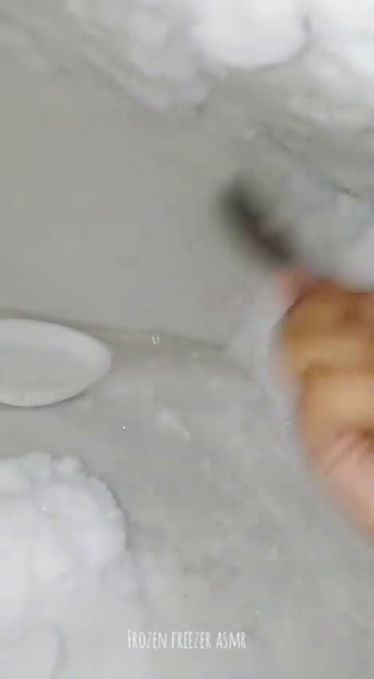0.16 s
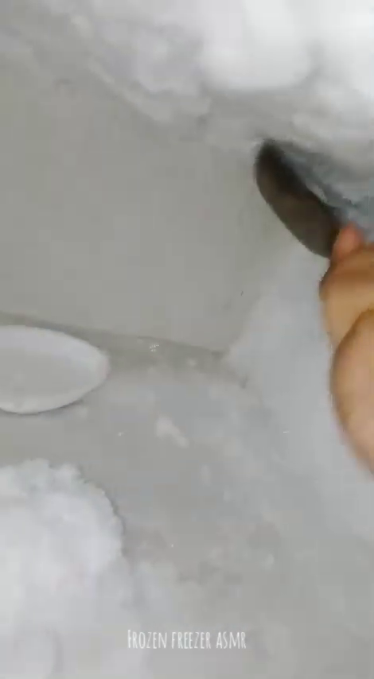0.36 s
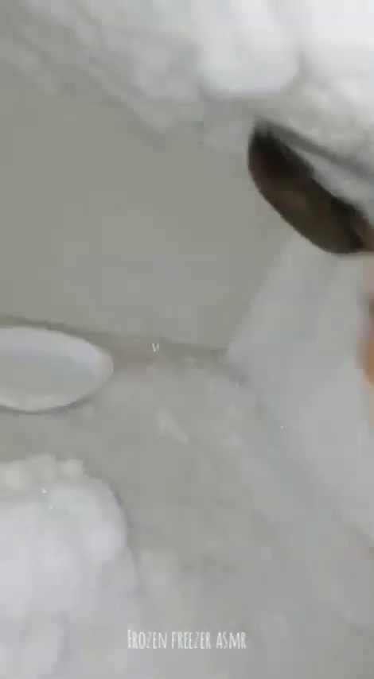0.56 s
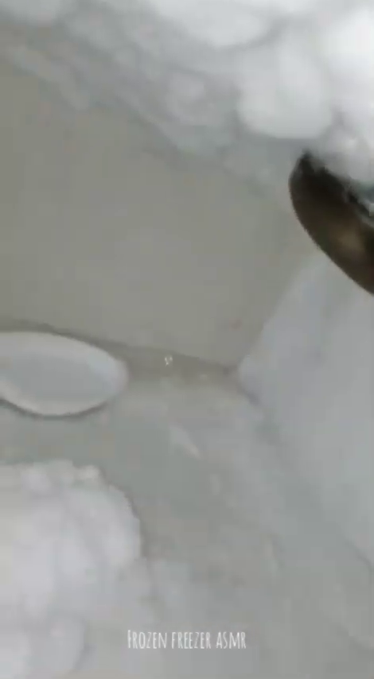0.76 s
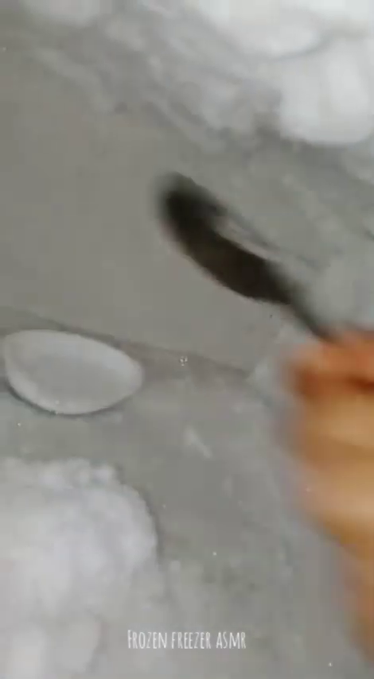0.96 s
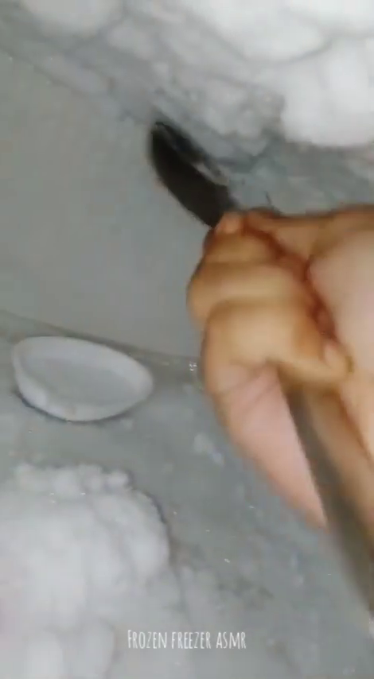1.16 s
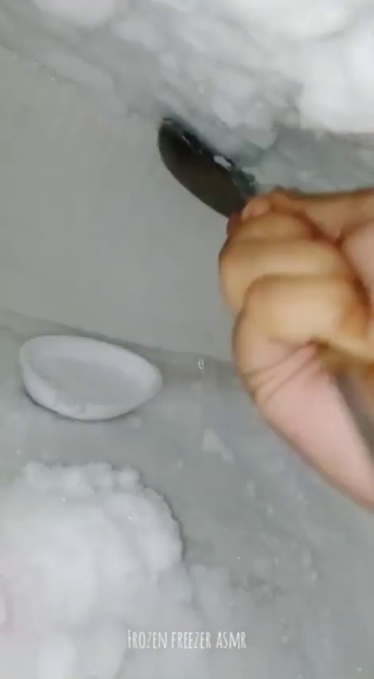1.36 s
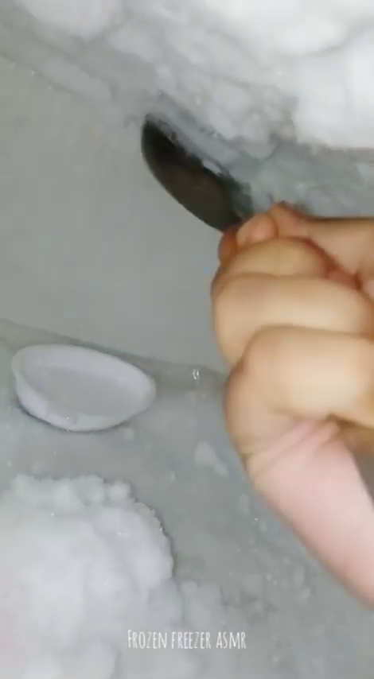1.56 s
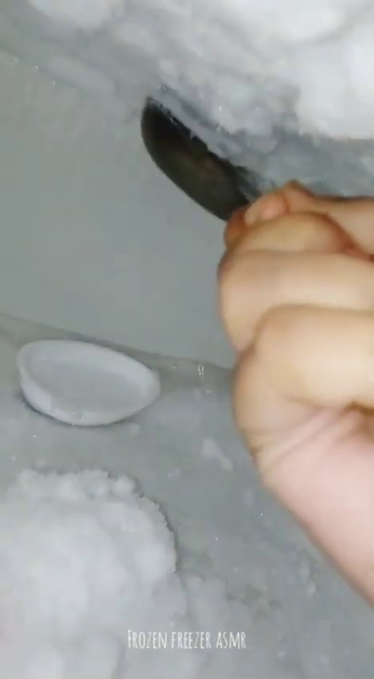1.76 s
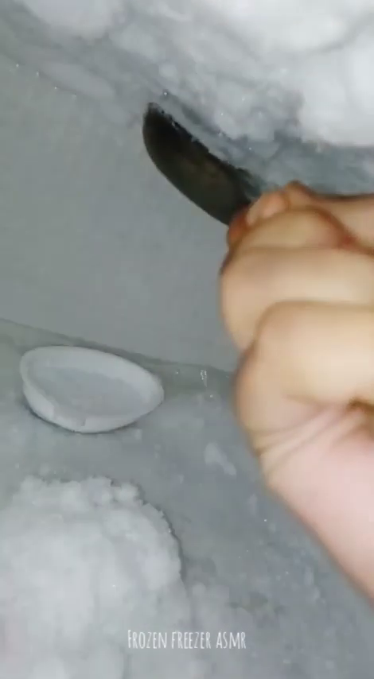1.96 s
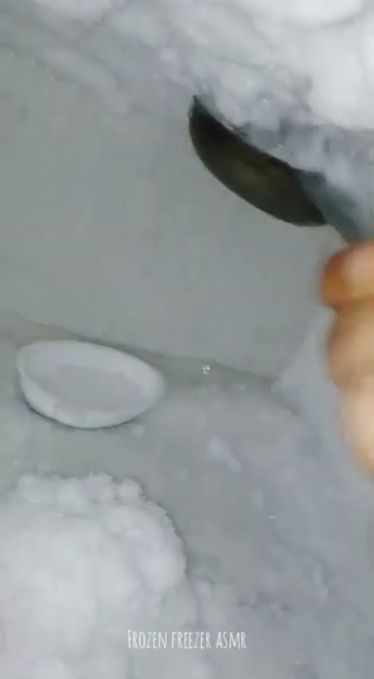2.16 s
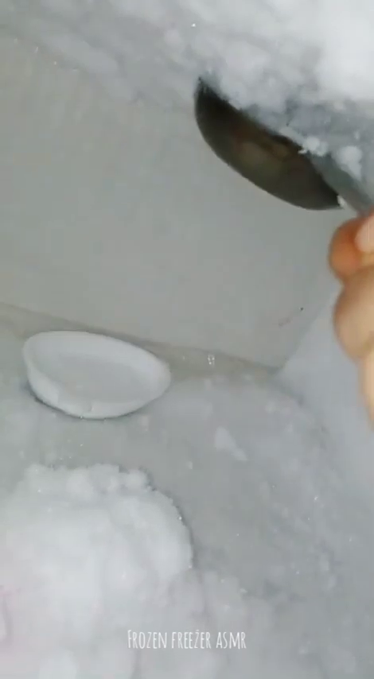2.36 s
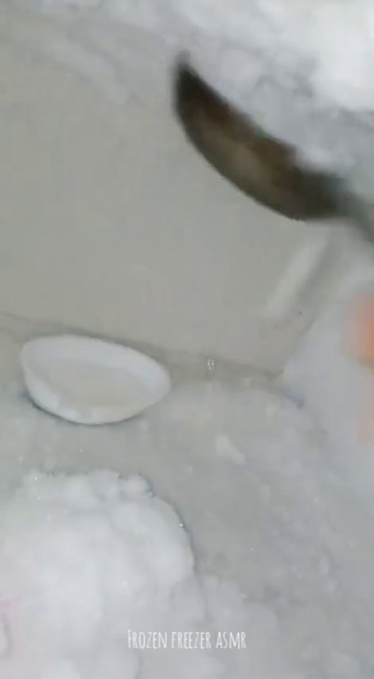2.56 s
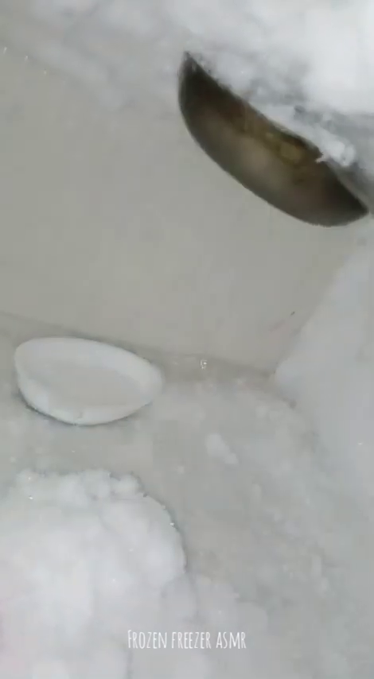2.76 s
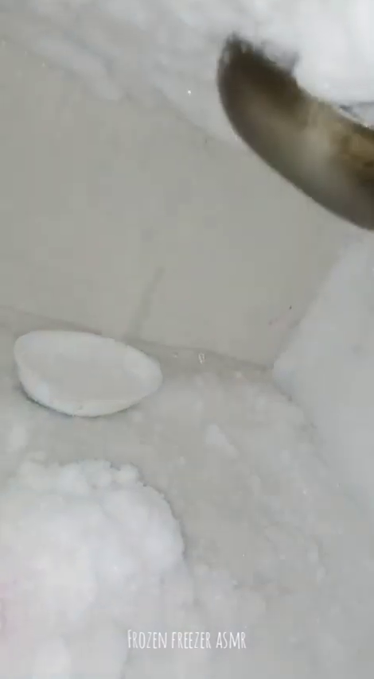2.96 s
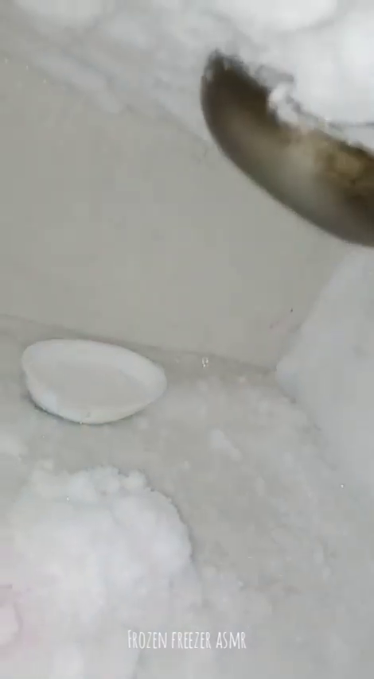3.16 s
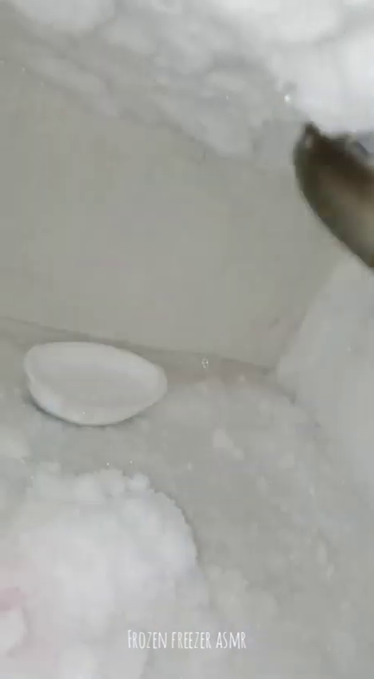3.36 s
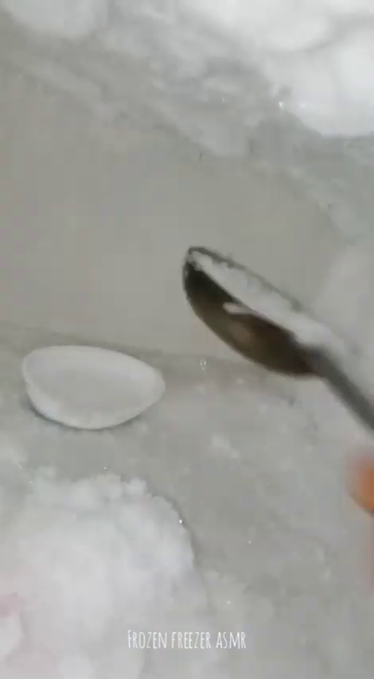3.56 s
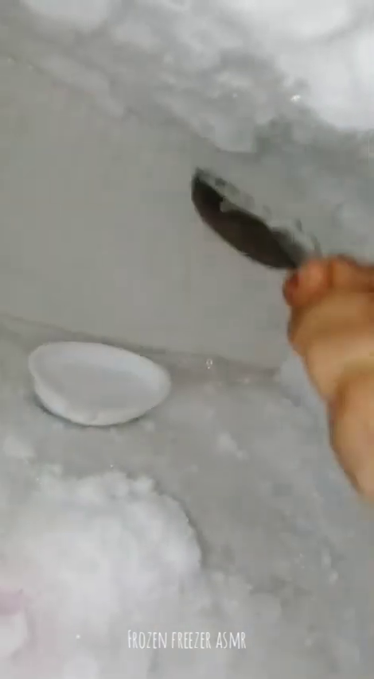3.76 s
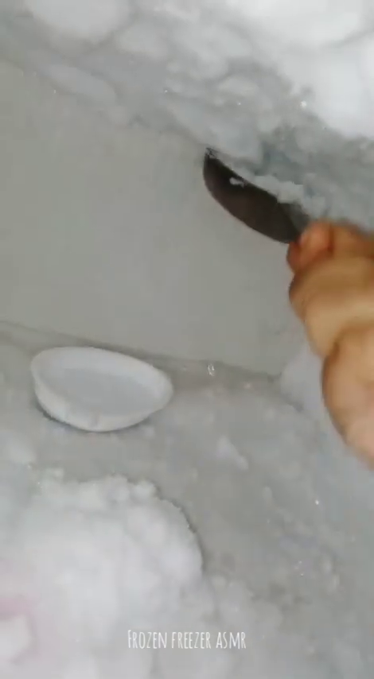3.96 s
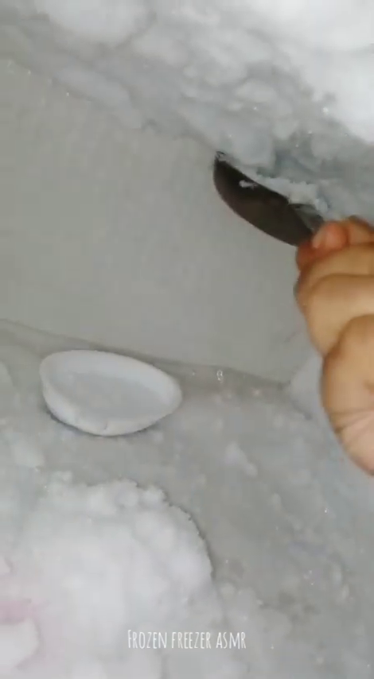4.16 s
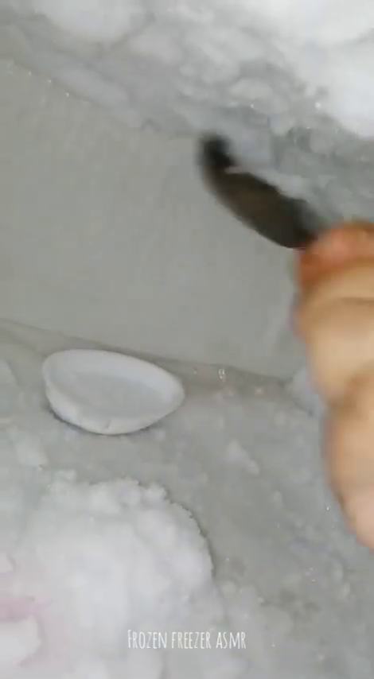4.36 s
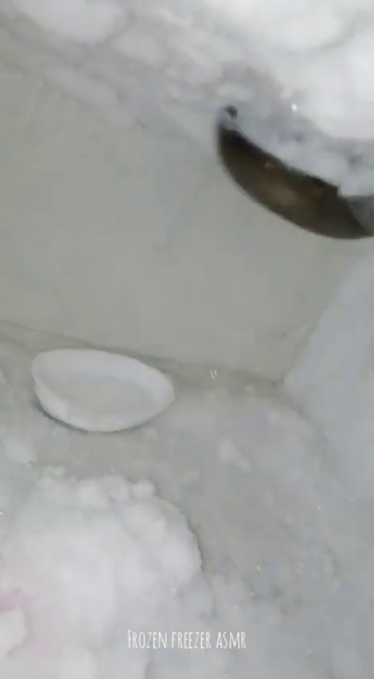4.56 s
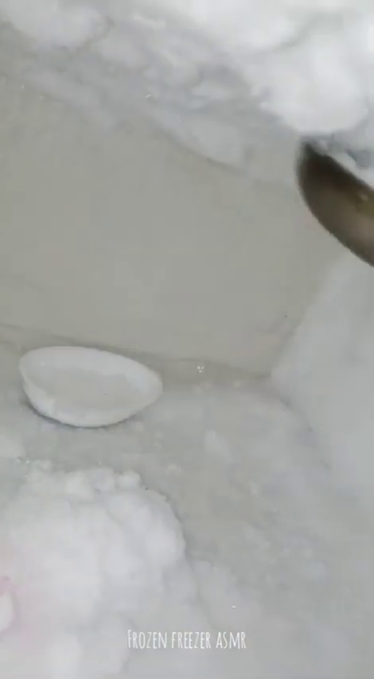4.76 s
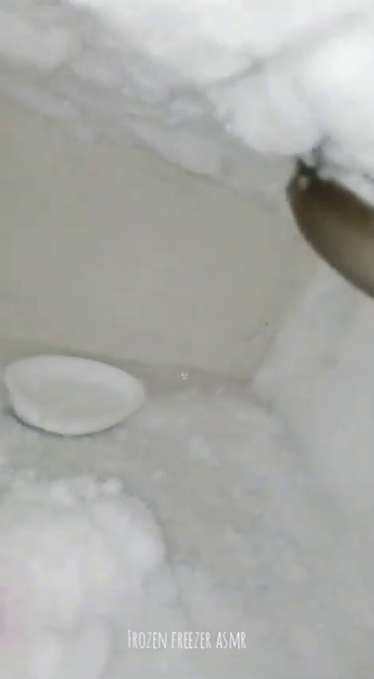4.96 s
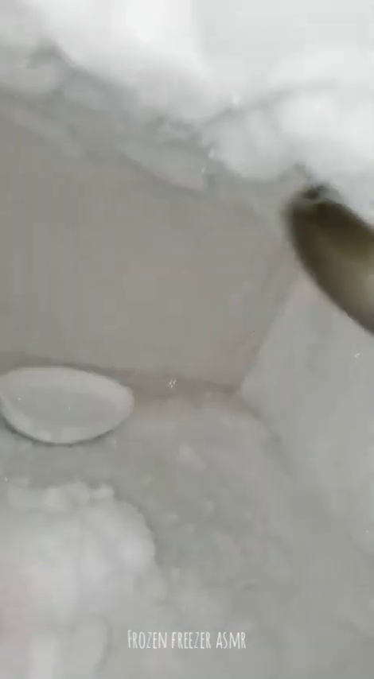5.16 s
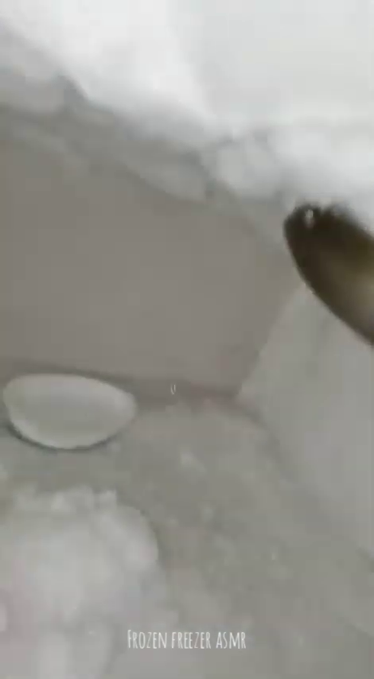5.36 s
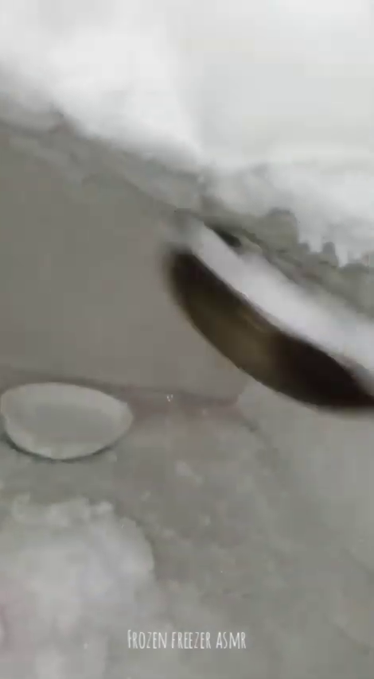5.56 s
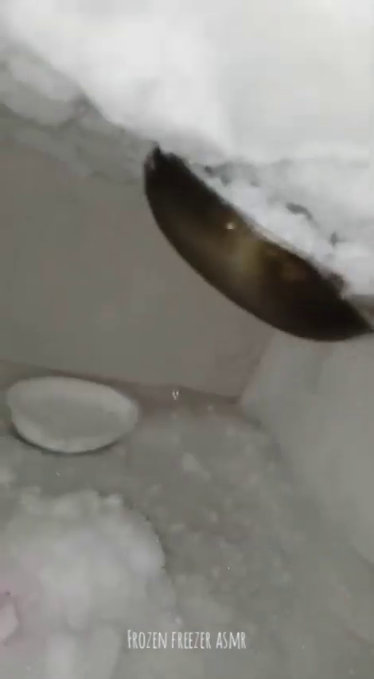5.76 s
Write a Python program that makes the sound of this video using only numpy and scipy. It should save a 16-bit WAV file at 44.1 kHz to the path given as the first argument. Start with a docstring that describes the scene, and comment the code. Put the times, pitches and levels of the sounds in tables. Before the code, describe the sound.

A metal spoon scrapes thick frost inside a freezer in uneven strokes, with crisp crunching, sharp cracks, dull wall thumps and small pattering crumbs.

```python
"""Spoon scraping freezer frost

A steel spoon scrapes thick frost off a freezer wall, close to a phone with one microphone.
Random crystal breaks excite resonances of wall, ice and spoon, and are also heard directly as coloured noise.
Crusts crack as short noise bursts, chunks thump the wall as damped sines, and crumbs patter in showers.
The cabinet answers with a brief decaying tail, over a low rumble that swells with the push."""
import sys
import numpy as np
from scipy import signal
from scipy.fft import rfft, irfft, next_fast_len
from scipy.io import wavfile
from scipy.ndimage import uniform_filter1d, map_coordinates

SR = 44100
rng = np.random.default_rng(int(sys.argv[2]) if len(sys.argv) > 2 else 0)


def wrap_up_sound(samples):
    """Save the sound to the file named by the first command line argument, as 16-bit audio."""
    columns = np.atleast_2d(samples).T
    # keep every value between -1 and 1, then stretch to whole-number steps
    tamed = np.clip(columns, -1, 1)
    steps = np.round(tamed * 32767).astype(np.int16)
    wavfile.write(sys.argv[1], SR, steps)


N = 256662  # length [samples]

# upper modes of wall and ice: (frequency [Hz], width [Hz], relative level [dB])
LINER = [(372, 72, -3.5), (493, 45.7, 5.5), (665, 540, -13), (803, 99, -2), (945, 56, 1), (1243, 77, -8)]
# modes of the spoon, damped by ice: (frequency [Hz], width [Hz], relative level [dB])
SPOON = [(1648, 21, 6.5), (1998, 170, 3), (2250, 160, -5.5), (2600, 60, 5), (3077, 390, -0.5),
         (4336, 58, 2.5), (5750, 100, -10.5), (6600, 284, 3), (8480, 350, -11), (9200, 324, -3),
         (10800, 330, -25), (11330, 300, -21), (15100, 3400, -10)]


def amp(db):
    """Level to amplitude: 20 dB is a factor of ten."""
    return 10 ** (np.asarray(db) / 20)


def unit(x):
    """Normalisation to a root-mean-square of one."""
    return x / np.sqrt(np.mean(x ** 2) + 1e-20)


def along(points, hz):
    """Linear interpolation of (frequency [Hz], value) points on a logarithmic frequency axis."""
    f, v = np.transpose(points)
    return np.interp(np.log(hz + 1), np.log(f + 1), v)


def wobble(rate):
    """Slow random fluctuation: a smooth curve through random knots, rate of them a second."""
    knots = rng.standard_normal(int(N * rate / SR) + 4)
    return map_coordinates(knots, [np.arange(N) * rate / SR])


def filtered(x, response):
    """Linear filtering: the spectrum of x times a complex response of frequency."""
    m = next_fast_len(N + SR // 2)  # room for the tail
    spectrum = rfft(x, m) * response(np.fft.rfftfreq(m, 1 / SR))
    return irfft(spectrum, m)[..., :N]


def modes(table):
    """Modal superposition: causal damped resonances of alternating sign."""
    def response(f):
        return sum((-1) ** k * amp(db) * 1j * f * width / (centre * centre - f * f + 1j * f * width)
                   for k, (centre, width, db) in enumerate(table))
    return response


def crush(rate, ms, spread_db, smooth):
    """Random fracture: breaks of uneven size, each a noise swell peaking after ms, on smooth friction."""
    happens = rng.random(N) < rate / SR
    breaks = happens * amp(spread_db * rng.standard_normal(N))
    u = 1000 * np.arange(SR // 20) / SR / ms
    bursts = signal.fftconvolve(breaks, u * np.exp(-u))[:N]
    return (unit(bursts) + smooth) * rng.standard_normal(N)


def ringing(excite, table, lift_db, unrest_db):
    """Forced resonance: each mode has its own breaks; hand and ice damp each differently over time."""
    total = 0
    for mode in table:
        unrest = unrest_db * (wobble(18) + 1.2 * wobble(4.057))
        total = total + amp(unrest + lift_db(mode[0])) * filtered(excite(), modes([mode]))
    return total


def scraping():
    """Stick-slip fracture under one uneven grip drives wall, ice and spoon."""
    # bite of the rim, one curve for each stroke from touch to rest:
    # (time [s], pressure as level of the crystal hiss [dB])
    strokes = [
        [(0, -70), (.012, -31), (.045, -48.5), (.12, -65), (.19, -62)],
        [(.205, -31), (.236, -38.5), (.252, -26.5), (.294, -48)],
        [(.31, -44), (.366, -27.5), (.45, -34), (.5, -21), (.53, -38), (.56, -28), (.672, -28), (.735, -36),
         (.755, -47.5), (.82, -40), (.848, -56), (.96, -71), (1.135, -81)],
        [(1.148, -46), (1.2, -27.5), (1.234, -49.5), (1.278, -46.5), (1.31, -67)],
        [(1.35, -53), (1.385, -47.5), (1.42, -53)],
        [(1.435, -37), (1.45, -34.5), (1.49, -32.5), (1.558, -32), (1.63, -29), (1.655, -35.5), (1.68, -57),
         (1.754, -63), (1.89, -73)],
        [(1.91, -61), (1.99, -65), (2.03, -45.5), (2.055, -58)],
        [(2.068, -23.5), (2.108, -27.5), (2.128, -33.5), (2.164, -22.5), (2.185, -33), (2.216, -51.5),
         (2.26, -48.5), (2.44, -70.5)],
        [(2.48, -39.5), (2.52, -29), (2.556, -22), (2.614, -29.5), (2.64, -39), (2.7, -55), (2.76, -43)],
        [(2.778, -24), (2.832, -21), (2.882, -31), (2.9, -22.5), (2.922, -34.5), (2.94, -46.5), (2.985, -43)],
        [(3.03, -38.5), (3.07, -38), (3.12, -43), (3.152, -54.5), (3.18, -47.5)],
        [(3.198, -26.5), (3.25, -27), (3.3, -39.5), (3.33, -49), (3.376, -40.5), (3.41, -54.5), (3.476, -69.5),
         (3.62, -70), (3.8, -86)],
        [(3.82, -54), (3.9, -63), (3.935, -56.5), (3.947, -30.5), (3.97, -50.5), (4.0, -34), (4.025, -45.5),
         (4.045, -62)],
        [(4.07, -42), (4.09, -35.5), (4.14, -34), (4.172, -36.5), (4.244, -28.5), (4.31, -26), (4.378, -25),
         (4.426, -37), (4.48, -27), (4.54, -35), (4.6, -24.5), (4.7, -27), (4.8, -24), (4.85, -25), (4.88, -34),
         (4.95, -24.5), (5.0, -36), (5.015, -50.5)],
        [(5.068, -48.5), (5.1, -35), (5.208, -29), (5.235, -42), (5.26, -55.5), (5.38, -69)],
        [(5.4, -39), (5.43, -48.5), (5.54, -61), (5.64, -71)],
        [(5.662, -41.5), (5.696, -52), (5.734, -38), (5.82, -33.5)],
    ]
    # how the spoon meets the frost from each moment on: (time [s], wall drumming [dB], coarse crunch [dB],
    # best-ringing part of the spoon [Hz], lift of the finest fizz [dB]);
    # drumming and crunch are relative to the hiss at the usual pressure
    angles = [(0, -1, 7.5, 2780, -24), (.19, 1, -2, 3260, -16), (.3, -4, 3.5, 1996, -4),
              (.42, 3, 7, 1980, -3.5), (0.619, 2, 4, 2060, -2), (.76, 8, -2, 4380, -3),
              (.85, -5.5, -2.5, 1980, 5.5), (1.145, -5.5, 3.5, 2300, -11), (1.25, 3.5, 5.5, 2320, -0.5),
              (1.42, 5.5, 5.5, 2420, -6), (1.669, 16.5, 11, 2300, -19), (1.76, 7, 1.5, 4070, 0.5),
              (2.059, -11.5, 1, 2500, -4.5), (2.199, 11, 6.5, 2860, -8), (2.471, 2, 2, 2220, -6),
              (2.63, 8.5, -5, 2240, -15), (2.76, 3.5, 0, 2270, -2), (2.93, 5, -1.5, 2400, -2.5),
              (2.98, 10, 2, 3100, 1.5), (3.18, 5.5, 3.5, 2245, 3), (3.31, 8, 1.5, 3520, -2.5),
              (3.451, -0.5, 5, 2320, 0), (3.8, 0, 3.5, 2560, -9.5), (4.05, -0.5, 2.5, 1950, -6.5),
              (4.2, 2.5, 1, 2380, -8), (4.42, 1.5, 6, 3260, -0.5), (4.58, 3.5, 0.5, 4320, -3.5),
              (4.7, 4.5, -0.5, 2015, -1.5), (4.87, 2.5, 1, 4350, -1.5), (5.04, 4, 3.5, 1967, 0.5),
              (5.25, -1, -4, 3000, -4), (5.64, -4, 6.5, 2750, 1)]
    # low wall modes: (frequency [Hz], width [Hz], relative level [dB])
    wall_modes = [(167, 57, -1.5), (228, 48, 3.5), (267, 44, -0.5)]
    # the whole cabinet shaking: (frequency [Hz], width [Hz], relative level [dB])
    case_mode = (95, 50, -18)
    # crystals heard directly: (frequency [Hz], relative level [dB])
    frost = [(900, -39), (1500, -12), (2600, -17), (5000, -12.5), (7400, -20), (10000, -23.5),
             (13000, -26.5), (16000, -44.5)]
    usual_db = -30
    wall_grows, crunch_grows = .9, 1  # dB for each dB of pressure, counted from the usual pressure
    focus_db, focus_spread = 6, .13  # lift of the modes nearest the best-ringing part; reach in log frequency

    t = np.arange(N) / SR
    hiss_db = np.interp(t, *np.transpose(np.concatenate(strokes)))
    starts, *held = np.transpose(angles)
    now = np.searchsorted(starts, t, side="right") - 1
    # about 20 ms of smoothing between angles
    wall_db, crunch_db, focus, fizz_db = (uniform_filter1d(column[now], size=900) for column in held)
    wall_db = wall_db + usual_db + wall_grows * (hiss_db - usual_db)
    crunch_db = crunch_db + usual_db + crunch_grows * (hiss_db - usual_db)
    grip = amp(1.6 * wobble(35))

    def breaks():
        return grip * crush(220, 1.7, 4, .7)

    def near_focus(hz):
        return focus_db * np.exp(-(np.log(hz / focus) / focus_spread) ** 2)

    wall = filtered(breaks(), modes(wall_modes + [case_mode]))
    crunch = ringing(breaks, LINER, lambda hz: 0, unrest_db=2)
    direct = filtered(breaks(), lambda f: amp(along(frost, f)))
    hiss = unit(ringing(breaks, SPOON, near_focus, unrest_db=2) + direct)
    # faster strokes break finer crystals: the held lift acts above about 5.2 kHz
    fizz = filtered(hiss, lambda f: 1 / (1 + (5200 / (f + 1)) ** 6))
    crystals = amp(hiss_db) * (hiss + (amp(fizz_db) - 1) * fizz)
    return amp(wall_db) * unit(wall) + amp(crunch_db) * unit(crunch) + crystals


def rumble(push):
    """Amplitude modulation: low, unsteady noise swells with the smoothed power of the push."""
    # colour of the rumble: (frequency [Hz], relative level [dB])
    colour = [(18, -79), (30, -52.5), (53, -10), (75, -11), (210, -23.5), (512, -28.5), (684, -39.5),
              (822, -62.5), (2060, -41), (16000, -68)]
    # mean level without the push: (time [s], level [dB])
    rest = [(0, -56), (.15, -50), (.5, -63), (.9, -59), (1.02, -68), (1.15, -59), (1.85, -64), (2.301, -50),
            (3.1, -56), (3.5, -58.5), (3.85, -60.5), (4.1, -60), (5.1, -48), (5.45, -52), (5.62, -67),
            (5.82, -60)]
    shake_db, shake_s = -25.5, .045  # swell against wall and scrape sound; time constant of following

    noise = filtered(rng.standard_normal(N), lambda f: amp(along(colour, f)))
    power = filtered(push ** 2, lambda f: 1 / (1 + 2j * np.pi * f * shake_s))
    swell = np.sqrt(np.abs(power))
    still = amp(np.interp(np.arange(N) / SR, *np.transpose(rest)))
    return (still + amp(shake_db) * swell) * amp(.65 * wobble(23)) * unit(noise)


def cabinet(x):
    """Reverberation: each frequency of the box's answer dies at its own speed."""
    # decay: (frequency [Hz], time to fall by 60 dB [s])
    decay = [(200, 0.39), (1000, 0.14), (4000, 0.057), (12000, 0.0067)]
    hz, t, z = signal.stft(rng.standard_normal(SR // 2), SR, nperseg=256)
    fading = z * amp(-60 * t / along(decay, hz)[:, None])
    tail = signal.istft(fading, SR, nperseg=256)[1]
    return signal.fftconvolve(x, tail / np.linalg.norm(tail))[:N]


def cracks():
    """Brittle fracture: short noise bursts with a fast rise, which also ring the spoon."""
    # crust cracks: (time [s], burst level before colouring [dB],
    # part under 2.5 kHz relative to it before the common low gain [dB], time to fall by 60 dB [ms])
    crusts = [(0.0123, -20, -5, 17), (0.0288, -12, -2, 7.2), (0.1572, -30, -35, 17),
              (0.2082, -11.5, -11.5, 34), (0.2489, -21.5, -3.5, 57), (0.3172, -25.5, -4, 83),
              (0.4841, -5, -5, 6.4), (0.5373, -15, 8.5, 15), (0.7777, -30, -7, 93),
              (0.9164, -21, -18, 11.5), (1.144, -33.5, 12.5, 20), (1.176, -36, 11, 22),
              (1.193, -19, -4.5, 62), (1.3269, -30.5, -9, 13), (1.353, -29.5, -12, 29),
              (1.384, -24, 2.5, 21), (1.4093, -14.5, -20, 7.7), (1.429, -11, 3.5, 23), (1.486, -20, 3, 14),
              (1.5, -13.5, -1, 16), (1.537, -28, -8, 32), (1.7943, -35.5, -32, 25), (1.9034, -4, -15, 12.9),
              (2.0032, -24, -10, 11), (2.0273, -4, -21, 14), (2.0674, -19.5, 11, 9.1),
              (2.2753, -16, -30, 13), (2.292, -13, -33, 9.9), (2.3168, -20, -48, 25),
              (2.337, -15.5, -11, 11), (2.3765, -34, -19, 25), (2.397, -27, -16, 18), (2.4663, -30, -3, 15),
              (2.484, -15.5, 1.5, 12.6), (2.5155, -10.5, -5.5, 20), (2.6812, -29.5, -23, 32),
              (2.7279, -23.5, -5, 31), (2.7737, -21, 2, 22), (2.7965, -11.5, -7, 20), (2.822, -17, 6.5, 29),
              (2.862, -7, -12, 11), (2.8954, -19.5, 7, 22), (2.994, -7.5, -19, 12), (3.034, -11.5, -1, 10),
              (3.1118, -18, -7, 11.7), (3.1987, -33.5, 17, 110), (3.363, -23, -23, 23),
              (3.487, -29.5, -32, 13), (3.496, -36, -16.5, 13), (3.555, -33.5, -4, 16.3),
              (3.8146, -18.5, -3.5, 39), (3.915, -42, -3, 24), (3.931, -25, -30, 12),
              (3.9419, -22.5, 2, 19), (4.0647, -39.5, 11, 22), (4.129, -30, 3, 49), (4.183, -39, -5, 16),
              (4.2184, -22, 3, 26), (4.2435, -28.5, 8.5, 52), (4.262, -11, -8, 16), (4.3062, -25, 9, 90),
              (4.365, -30, 11, 37), (4.4066, -14, -5, 23), (4.474, -27, 0, 17), (4.505, 4.5, -34, 6.2),
              (4.8715, 0.5, -26, 10), (4.8923, -13, -1, 14), (5.0533, -19, -14, 23), (5.0814, -20, -25, 14),
              (5.1003, -15, -32, 13), (5.1813, -21, -4, 60), (5.294, -23, -12, 9.9), (5.3702, -29, -10, 16),
              (5.3924, -1, -11.5, 14.2), (5.648, -19.5, -6, 15), (5.665, -23.5, 3, 30)]
    # colour of a crack: (frequency [Hz], relative level [dB])
    snap_colour = [(80, -21.5), (150, 3), (700, -9), (2500, 0.5), (6000, -0.5), (10000, -19.5),
                   (16000, -36)]
    high, low, t = np.zeros(N + SR), np.zeros(N + SR), np.arange(SR // 10) / SR
    noise = rng.standard_normal((len(crusts), len(t)))
    for (s, db, low_db, t60), burst in zip(crusts, noise):
        burst = burst * amp(db - 60000 * t / max(t60, 3)) * (1 - np.exp(-t / .00099))
        start = round(s * SR)
        high[start:][:len(t)] += burst
        low[start:][:len(t)] += burst * amp(low_db)

    def snap(f):
        return amp(along(snap_colour, f))

    def treble(f):
        return 1 / (1 + (2500 / (f + 1)) ** 6)

    spoon = modes(SPOON)
    bright = filtered(high[:N], lambda f: treble(f) * (snap(f) + 1.2 * spoon(f)))
    dark = filtered(low[:N], lambda f: (1 - treble(f)) * snap(f))
    return bright + amp(12) * dark  # common low gain


def thumps():
    """Damped free vibration: the panel swings as a chunk tears loose; contact shortens its upper modes."""
    # chunks giving way: (time [s], level before the bass cut [dB],
    # shift of the upper modes against it [dB], panel pitch [Hz])
    chunks = [(0.014, -13.5, 6.5, 169.7), (.217, -22, -13.5, 194), (.357, -33, 0, 263),
              (.421, -12, 12.5, 221), (.578, -30, 0, 250), (.615, -7, -11.5, 223), (.787, -29, -6, 273),
              (1.145, -6, 0, 216.5), (1.194, -20, -1.5, 226), (1.346, -34, -4, 229),
              (1.38, -33.5, -26, 265), (1.609, -9.5, 5.5, 223), (1.797, -30.5, -11, 195),
              (2.071, -9, -14, 218), (2.101, -1.5, -4, 226), (2.151, -7.5, -31, 184),
              (2.481, -26, 6.5, 315), (2.513, -11.5, 9, 277.6), (2.558, -6.5, -25.5, 208),
              (2.573, -6.5, -15.5, 230), (2.61, -14.5, -14, 222.4), (2.65, -20, -14, 222),
              (2.778, -10.5, -7, 248), (2.795, -13, -14.5, 240.6), (2.836, -5, -28, 225),
              (2.898, -9, 2.5, 218), (3.046, -18.5, -25, 238), (3.08, -22.5, -23, 201),
              (3.113, -21.5, -18, 234), (3.197, -15, -5, 230), (3.229, -9, -16.5, 214),
              (3.283, -13, -15, 223), (3.34, -24.5, -2, 226), (3.816, -37, 23.5, 256),
              (3.943, -13, 5.5, 217.5), (4.214, -24.5, 0, 220), (4.312, -12, -21, 262),
              (4.347, -11.5, -12.5, 230), (4.382, -7, 4, 220), (4.407, 2, -30, 215), (4.472, -11, 5.5, 190),
              (4.523, -3.5, -1, 233), (4.607, -2.5, -20, 219), (4.657, -13.5, 0, 193),
              (4.797, -16, -12, 250), (4.851, -8.5, -23, 200.6), (4.894, -8, -23, 199),
              (5.1, -16.5, -19, 235), (5.13, -15.5, -26, 213), (5.187, -19.5, -19, 219),
              (5.392, -21.5, -27, 177), (5.667, -26, -7, 204), (5.728, -25.5, -16, 234),
              (5.766, -21, -10, 227)]
    tear_s = .014  # the panel swings freely this long before it is damped
    out, t = np.zeros(N + SR), np.arange(SR // 5) / SR
    chance = rng.standard_normal((len(chunks), len(LINER)))
    stop = amp(-60 * np.maximum(t - tear_s, 0) / .03)
    for (s, db, upper_db, pitch), scatter in zip(chunks, chance):
        strengths = amp(upper_db + 2 * scatter)
        ring = 0
        for k, ((hz, width, level), strength) in enumerate(zip(LINER, strengths)):
            fade = np.exp(-1.6 * np.pi * width * t)
            ring = ring + (-1) ** k * strength * amp(level - 11) * fade * np.sin(2 * np.pi * hz * t)
        swing = np.sin(2 * np.pi * pitch * t) * stop
        out[round(s * SR):][:len(t)] += amp(db) * (swing + ring)
    # little deep bass: a two-pole cut below about 110 Hz
    return filtered(out[:N], lambda f: (1j * f / (110 + 1j * f)) ** 2)


def crumbs():
    """Random impacts: loosened crystals patter in showers that swell, peak just before midway and thin out."""
    # showers of loose crumbs: (time [s], length [s], level at the fullest [dB])
    showers = [(0.143, 0.058, -50), (0.836, 0.1, -55), (1.792, 0.076, -59), (2.267, 0.18, -41),
               (2.687, 0.13, -43), (2.926, .06, -48), (3.06, 0.089, -52), (3.334, 0.1, -52),
               (4.99, 0.04, -61), (5.306, 0.15, -47.5), (5.428, 0.088, -48)]
    # colour of a crumb: (frequency [Hz], relative level [dB])
    crumb_colour = [(900, -29), (2000, -9.5), (4500, -1), (9000, -11), (16000, -15.5)]
    t = np.arange(N) / SR
    density = sum(amp(db) * np.sin(np.pi * np.clip((t - s) / length, 0, 1) ** .91)
                  for s, length, db in showers)
    patter = filtered(crush(110, .91, 4.5, .52), lambda f: amp(along(crumb_colour, f)))
    return density * unit(patter)


def scene():
    """Superposition: all sources add at one microphone, given to two equal channels."""
    push = scraping() + thumps()
    near = push + cracks() + crumbs()
    cabinet_db = -19
    mono = near + amp(cabinet_db) * cabinet(near) + rumble(push)
    return np.tile(mono, (2, 1))


def record(dry):
    """Band limiting and saturation: the microphone's colour, gentle overload, then a sharp upper limit."""
    # microphone response: (frequency [Hz], level [dB])
    phone = [(20, -30), (45, -14), (90, 0), (11500, 0), (12300, -9), (14300, -9), (14600, -1), (15000, -5),
             (15700, -7), (15900, -24), (16400, -34), (17000, -60)]
    top_hz = 17000
    coloured = filtered(dry, lambda hz: amp(along(phone, hz)))
    held = coloured / (1 + np.abs(coloured / .9) ** 4) ** (1 / 4)  # bends towards a ceiling of 0.9
    return filtered(held, lambda hz: hz < top_hz)


dry = scene()
out = record(dry)
wrap_up_sound(out)
```